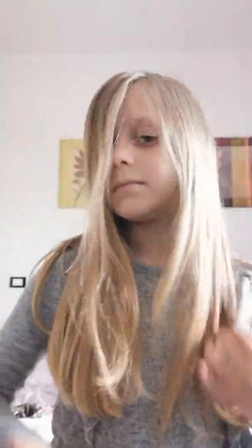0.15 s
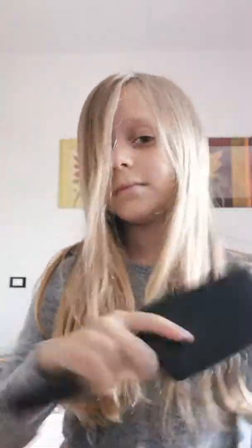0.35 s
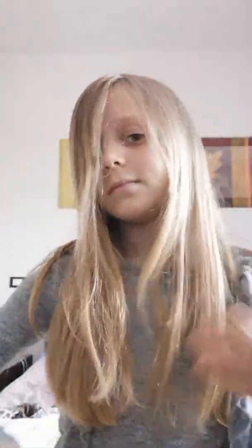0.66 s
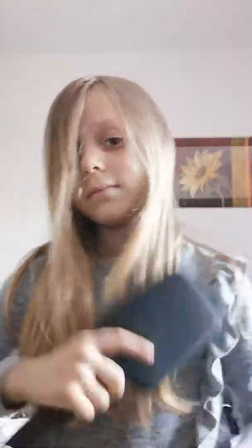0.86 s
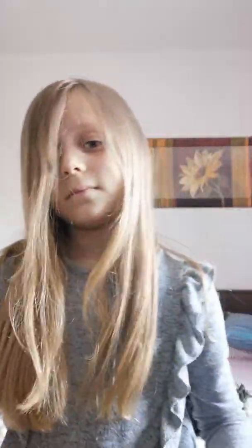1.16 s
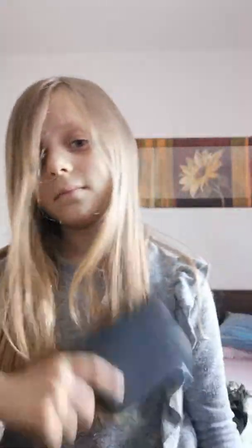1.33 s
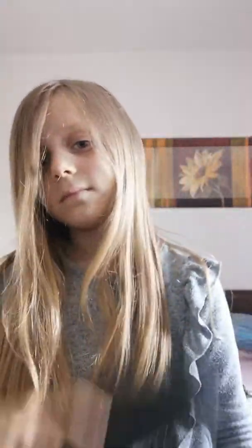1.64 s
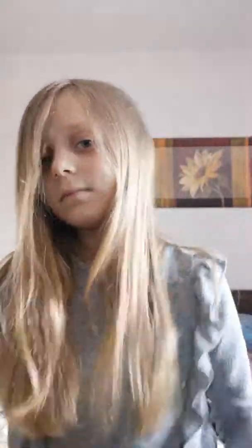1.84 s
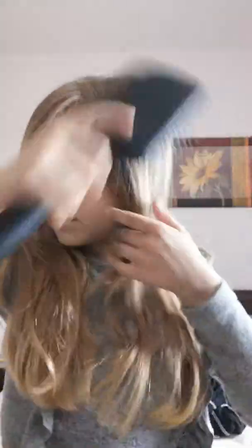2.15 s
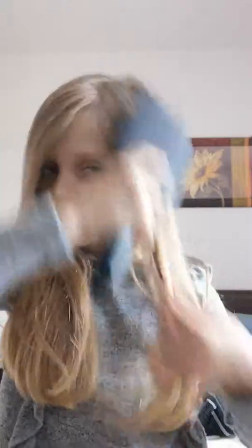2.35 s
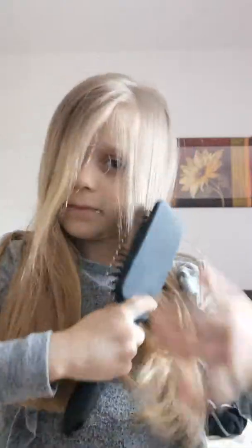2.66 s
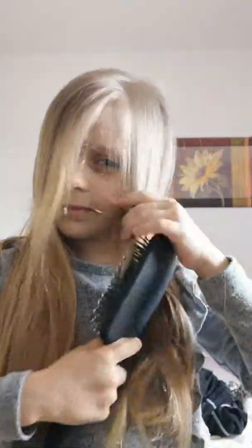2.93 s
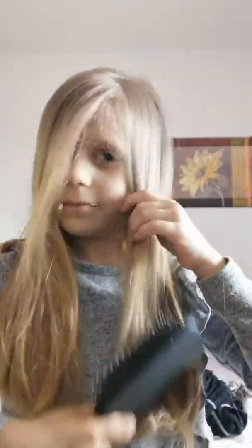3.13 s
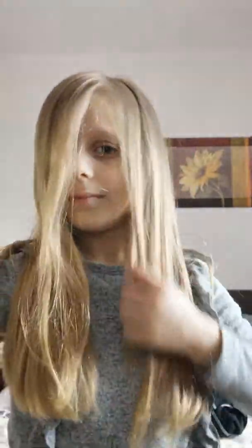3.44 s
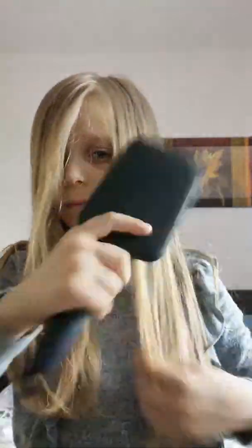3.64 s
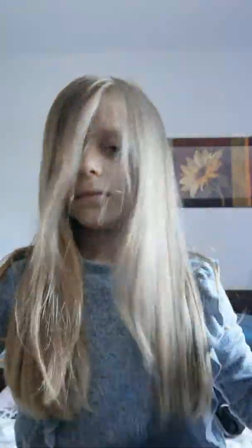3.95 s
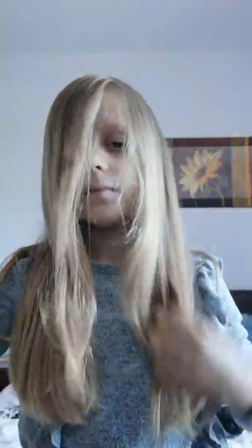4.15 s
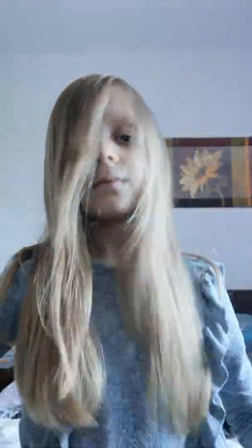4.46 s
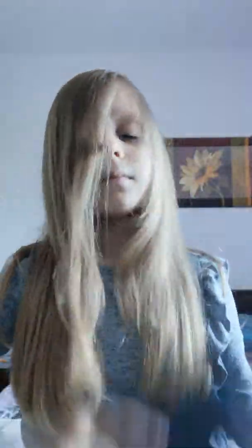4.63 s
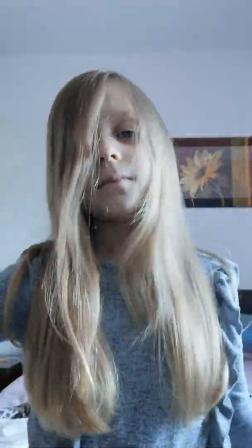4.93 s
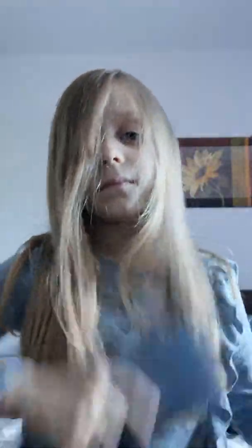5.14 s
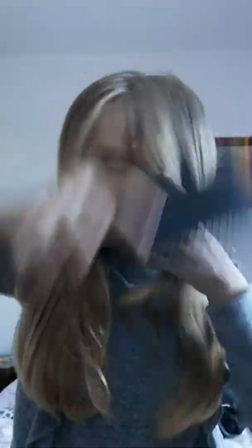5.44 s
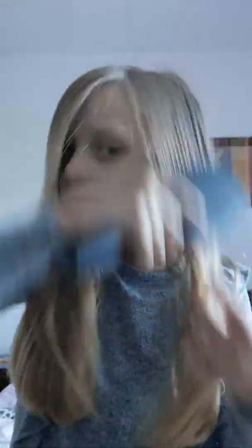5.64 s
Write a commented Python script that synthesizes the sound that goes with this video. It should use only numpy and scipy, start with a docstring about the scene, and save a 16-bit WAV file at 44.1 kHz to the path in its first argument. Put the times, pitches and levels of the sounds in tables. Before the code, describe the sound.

Spaced strokes of a hairbrush, each roughly a fifth of a second: a soft thump, a raspy swish of pins and a woody rubber drumming, with small snaps as knots give. A quieter lull of cloth and hair rustling comes midway, then knotty strokes and smoother, thumping ones. Close phone stereo, brush louder on the right, short soft room reflections and very quiet room tone.

```python
"""Brushing long hair

A paddle brush is drawn through long hair, stroke after stroke, close to a phone in a small bedroom.
It lands with a soft thump: damped booms. Pins catch and flick free: random bursts of noise force drum
the cushion's modes, scratch in the pins and hiss in the hair; tangles snap as short kicks and bursts.
Banded noise makes rustles, arm rumble and a sleeve's zip; a low hum and faint hiss fill the room."""
import sys
import numpy as np
from scipy import signal
from scipy.fft import rfft, irfft, next_fast_len
from scipy.io import wavfile
from scipy.ndimage import map_coordinates

SR = 44100
rng = np.random.default_rng(int(sys.argv[2]) if len(sys.argv) > 2 else 0)


def wrap_up_sound(samples):
    """Save the sound to the file named by the first command line argument, as 16-bit audio."""
    columns = np.atleast_2d(samples).T
    # keep every value between -1 and 1, then stretch to whole-number steps
    tamed = np.clip(columns, -1, 1)
    steps = np.round(tamed * 32767).astype(np.int16)
    wavfile.write(sys.argv[1], SR, steps)


N = 255339
SIZE = next_fast_len(N + SR)
HZ = np.fft.rfftfreq(SIZE, 1 / SR)
TIME = np.arange(N) / SR

# Pulls of the brush through the hair, levels before each layer's trim. Each row: start in seconds, rise in
# seconds, hold in seconds, cushion drumming in dB, pin scratch in dB, hair hiss in dB, tangle 0-1,
# body rumble in dB.
STROKES = [ (0.0, 0.019, 0.067, -47.5, -50, -65, 0.4, -64),
           (0.08, .025, 0.013, -40.5, -53, -69.5, 0.2, -58),
           (0.468, .072, .11, -38.5, -50.5, -64, 0.16, -54),
           (0.948, .088, .11, -39, -46.5, -64.5, 0.23, -59),
           (1.397, .101, .074, -36, -46, -61.5, 0.13, -62),
           (1.805, .074, 0.015, -42, -49.5, -64.5, .14, -52), (2.346, 0.087, 0.062, -63, -67, -67, .3, -66),
           (2.469, 0.047, 0.17, -69.5, -69.5, -70.5, 0.3, -68),
           (2.693, 0.048, 0.058, -66, -65, -70, .6, -70), (2.765, 0.071, 0.064, -50.5, -51, -60, .5, -70),
           (2.99, 0.11, 0.13, -46, -48, -57.5, .45, -61.5),
           (3.233, 0.034, .11, -42.5, -50.5, -64, .35, -57),
           (3.795, .063, .152, -43.5, -48.3, -60, 0.47, -52),
           (4.022, .035, 0.043, -40, -58, -76.5, .3, -46),
           (4.412, 0.058, 0.091, -36, -49.5, -64, 0.08, -63),
           (4.812, .07, 0.071, -38.5, -47.4, -62.5, 0.02, -52),
           (5.181, .062, .048, -35.5, -48.5, -63, 0.04, -54),
           (5.589, 0.097, .13, -59.5, -63, -67, .05, -66)]
# The brush lands on the hair, levels before each layer's trim. Each row: time in seconds, tick in dB,
# thump in dB, knock in dB, swish in dB.
LANDINGS = [(0.4648, -44, -43, -38, -57), (0.9386, -50.5, -39.5, -42, -60.5),
            (1.3868, -44.5, -41.5, -44.5, -59.5), (1.7968, -46, -42.5, -43, -60.5),
            (2.3088, -50, -49, -51.5, -62), (3.7942, -34, -70, -52, -59), (4.422, -46, -63, -52, -62),
            (4.8116, -50, -36.5, -38, -60.5), (5.186, -56, -52, -45, -68), (5.2094, -54, -44, -35.5, -71),
            (5.604, -36, -62, -42, -52)]
# Level of the brush at the left port over the right. Each row: frequency in Hz, ratio in dB.
BALANCE_DB = [(370, -0.5), (700, -9), (980, -11), (1600, -2.5), (2050, -8.5), (2600, -7.5), (4000, -6.5),
              (9000, -7), (10500, -15)]
# Likeness of the brush at the two ports. Each row: frequency in Hz, likeness 0-1.
LIKENESS = [(350, 1), (600, 0.99), (1000, 0.38), (1500, 0.75), (2400, 0.4), (3500, 0.15)]
# Phase lead of the brush at the left port. Each row: frequency in Hz, lead in radians.
LEAD = [(110, 0), (330, -.75), (430, -1.2), (600, -2.4), (850, -2.9), (1300, -6.7), (2600, -9.1)]
# Likeness of the room at the two ports. Each row: frequency in Hz, likeness 0-1.
AIR_LIKENESS = [(130, 0.97), (280, 0.77), (450, 0.073)]


def brush(drum, scratch, hiss, tangle):
    """The same flicks drum the cushion, scratch in the pins and crackle in the hair; knots jerk more coarsely."""
    # Tangles letting go of a pin, and at 4.06 s a pat of the hand. Each row: time in seconds, level before the
    # shares below in dB, brightness in dB (more crackle in the hair, less drumming).
    snaps = [(0.014, -29.5, 1), (0.0296, -27, 0), (0.0765, -38, 9), (0.111, -32, -9), (0.3462, -60.5, 26.5),
             (0.5395, -26, 3), (0.582, -32, -17), (1.030, -27, -6), (1.052, -25.5, -5), (1.0695, -24, 1),
             (1.095, -26.5, -14.5), (1.176, -36.5, 4), (1.4847, -30, 4), (1.505, -27, -14),
             (1.8844, -28.5, -7), (1.902, -31.5, -6), (2.529, -45, -15.5), (2.666, -54, -16),
             (2.7145, -42, 6), (2.761, -39.5, 1), (2.793, -44, -2), (2.8247, -25.5, 4.5),
             (2.834, -27.5, -2), (2.8913, -26, 2), (3.0123, -34, 2), (3.0828, -31, 4), (3.2194, -23, 2),
             (3.267, -24, 6), (3.2882, -20, -5), (3.342, -31, -8), (3.8756, -23.5, 5), (3.9038, -24, -2),
             (3.922, -24.5, 0), (3.9637, -24, -2), (3.9947, -21, -3), (4.0602, -36, -15),
             (4.4554, -34.5, 12.5), (4.461, -27, 4), (4.505, -28, -11), (4.543, -25, -9), (4.896, -26.5, 1),
             (4.926, -21, -10), (5.249, -26, -8)]
    # Colour of the pins at mid speed. Each row: frequency in Hz, relative density in dB per Hz.
    pin_spectrum = [(300, -29), (480, -4.5), (800, 1.5), (1000, -5), (1200, -3.5), (2100, -7), (3000, -19),
                    (4500, -36), (7000, -63.5)]
    # Colour of the hair. Each row: frequency in Hz, relative density in dB per Hz.
    hair_spectrum = [(1880, -15.5), (3200, -2), (4170, -6), (5500, -4.5), (8290, -8), (10800, -4.5),
                     (14300, -18), (15500, -20)]
    snap_drum_db, snap_scratch_db, snap_hiss_db = 4.5, -2, -19.5  # a snap's share in each layer
    pin_shift, cushion_shift = 0.068, 0.045  # log pitch swing with speed and with pressure

    power = (1 - tangle) * flicks(rate_hz=900, spread_db=3.4, life_s=0.00029)
    power += tangle * flicks(rate_hz=85, spread_db=3.5, life_s=0.0013)
    clumps = unit(amp(1.3 * wobble(60)))  # locks of hair load the pins in turn
    snapped, snap_db, bright_db = np.transpose(snaps)
    landed, tick_db, _, knock_db, swish_db = np.transpose(LANDINGS)

    on_cushion = amp(0.4) * drum * clumps * friction(power, share=0.72)
    on_cushion[0] += kicks(snapped, snap_db + snap_drum_db - bright_db)
    on_cushion[0] += kicks(landed, knock_db + 12.0)

    on_pins = amp(3.0) * scratch * clumps * friction(power, share=0.81)
    on_pins += bursts(snapped, snap_db + snap_scratch_db, life_s=0.00078, rise_s=0.0001)
    on_pins += bursts(landed, tick_db + 1, life_s=0.0033, rise_s=0.0018)

    on_hair = amp(0.9) * hiss * friction(power, share=0.29 + 0.5 * tangle)
    on_hair += bursts(snapped, snap_db + snap_hiss_db + bright_db, life_s=0.0011, rise_s=0.00028)
    on_hair += bursts(landed, swish_db + 4.5, life_s=0.0036, rise_s=0.0024)

    def cushion_at(ratio):
        """The cushion with its modes at this pitch ratio."""
        return cushion_response(ratio, low_hz=215, high_hz=1750)

    def pins_at(ratio):
        """The pins with their colour at this pitch ratio."""
        return causal(amp(along(pin_spectrum, HZ / ratio)))

    pressure = wobble(12)  # the hand presses unevenly, tightening and slackening the cushion
    sound = gliding(on_cushion, cushion_at, cushion_shift, pressure)
    sound += gliding(on_pins, pins_at, pin_shift, speed())
    sound += filtered(on_hair, causal(amp(along(hair_spectrum))))
    return ports(sound, BALANCE_DB, LIKENESS, along(LEAD))


def cushion_response(ratio, low_hz, high_hz):
    """The cushion's broad modes, stretched by ratio; the small paddle radiates little below them."""
    # Rubber cushion in its hollow paddle. Each row: frequency at ratio 1 in Hz, half-power width in Hz,
    # relative level in dB.
    cushion_modes = [(274, 45, 7), (339, 73, 0), (414, 105, -4), (532, 60, -5), (737, 47, -6),
                     (898, 54, -4), (1143, 39, -9)]
    power = 0
    for hz, width_hz, db in cushion_modes:
        power = power + amp(2 * db) / (1 + ((HZ - hz * ratio) / (width_hz / 2)) ** 2)
    power = power / (1 + (low_hz / (HZ + 1)) ** 8) / (1 + (HZ / high_hz) ** 8)
    return causal(np.sqrt(power))


def pulls():
    """Gains of cushion, pins and hair, and how knotted the lock under the brush is."""
    # Shape of every pull: hiss and scratch give way to drumming as the brush travels toward the tips.
    # Each holds: lag in seconds, swell over the rise in dB, drift over the hold in dB,
    # crest in mid-hold in dB, release in dB per second.
    drum_shape = (-0.0044, 21, -1.5, 3, 352)
    scratch_shape = (0, 24, -3.5, 1, 229)
    hiss_shape = (.006, 17, -3.5, 1.5, 245)
    start, _, _, drum_db, scratch_db, hiss_db, tangle, _ = np.transpose(STROKES)
    current = np.searchsorted(start[1:], TIME)
    drum = stroke_gain(drum_db, drum_shape)
    scratch = stroke_gain(scratch_db, scratch_shape)
    hiss = stroke_gain(hiss_db, hiss_shape)
    return drum, scratch, hiss, np.clip(tangle[current], 0, 1)


def stroke_gain(levels_db, shape):
    """One layer's gain: each pull swells, crests in mid-hold and dies as the brush slips out."""
    touch_s = 0.013  # the pins sink into the hair this long before a pull
    lag_s, swell_db, drift_db, crest_db, release_db_per_s = shape
    gain = np.zeros(N)
    for (start, rise, hold, *_), level_db in zip(STROKES, levels_db):
        t = TIME - start - lag_s
        db = level_db + swell_db * np.minimum(t / rise - 1, 0)
        travel = np.clip((t - rise) / hold, 0, 1)
        db += drift_db * (travel - 0.5) + crest_db * (np.sin(np.pi * travel) - 0.5)
        db -= release_db_per_s * np.maximum(t - rise - hold, 0)
        touch = np.clip(t / touch_s + 1, 0, 1)
        gain = np.maximum(gain, touch * amp(db))
    return gain


def speed():
    """The pins' speed, -1 slow to 1 fast: highest as they land and as each pull gets going."""
    peak_s, impact_s = 0.049, 0.01  # Gaussian half lengths (to 1/e)
    pulling = [np.exp(-((TIME - start - rise) / peak_s) ** 2) for start, rise, *_ in STROKES]
    landing = [np.exp(-((TIME - s) / impact_s) ** 2) for s, *_ in LANDINGS]
    return 2 * np.max(pulling + landing, axis=0) - 1


def flicks(rate_hz, spread_db, life_s):
    """Power (mean 1) of pins flicking free at random moments, a few much harder than the rest."""
    released = rng.random(N) < rate_hz / SR
    size = amp(spread_db * np.minimum(rng.standard_normal(N), 2))
    power = signal.lfilter([1], [1, -np.exp(-1 / (life_s * SR))], released * size ** 2)
    return power / power.mean()


def friction(power, share):
    """Noise force of flicks (their share of the power) over smooth sliding."""
    share = np.clip(share, 0, 1)
    return rng.standard_normal((2, N)) * np.sqrt(share * power + 1 - share)


def bursts(times_s, levels_db, life_s, rise_s):
    """A short burst of noise force at each time, swelling and dying."""
    t = np.arange(SR // 20) / SR
    envelope = np.exp(-t / life_s) * (1 - np.exp(-t / rise_s))
    force = np.zeros((2, N + len(t)))
    for s, db in zip(times_s, levels_db):
        burst = rng.standard_normal((2, len(t))) * envelope
        force[:, round(s * SR):][:, :len(t)] += amp(db) * burst
    return force[:, :N]


def kicks(times_s, levels_db):
    """One clean push, a single sample, at each time."""
    samples = np.round(np.asarray(times_s) * SR).astype(int)
    return np.bincount(samples, amp(levels_db), N)[:N]


def gliding(force, response, shift, position):
    """force through response(pitch ratio), crossfading log pitch from -shift to shift as position goes -1 to 1."""
    position = np.clip(position, -1, 1)
    sound = 0
    for step in (-1, 0, 1):
        weight = np.maximum(1 - abs(position - step), 0)
        sound = sound + filtered(force * weight, response(np.exp(shift * step)))
    return sound


def chest_echo(x, strength, delay_s, travel):
    """The chest throws the sound back; the delay wanders at random, so the colour shifts."""
    lag = delay_s * np.exp(travel * wobble(6)) * SR
    echo = np.array([np.interp(np.arange(N) - lag, np.arange(N), side) for side in x])
    return (x + strength * echo) / np.hypot(1, strength)


def thumps(body_hz, paddle_hz, drag_hz, drag_width_hz):
    """Body and paddle boom at each landing, pitched a little differently; the body rumbles as the brush drags."""
    # Rumble over a pull: lag in seconds, swell over the rise in dB, drift over the hold in dB,
    # crest in mid-hold in dB, release in dB per second.
    rumble_shape = (0, 12, -2.5, 1, 152)
    rumble_db = np.transpose(STROKES)[-1]
    drag = stroke_gain(rumble_db, rumble_shape) * drone(drag_hz, drag_width_hz)
    sound = np.pad(drag, (0, SR))
    shifts = np.exp(rng.normal(0, 0.08, (len(LANDINGS), 2)))
    for (s, _, thump_db, knock_db, _), shift in zip(LANDINGS, shifts):
        body = amp(thump_db + 14) * boom(body_hz * shift[0], t60_s=0.09, attack_s=0.012)
        paddle = amp(knock_db + 7) * boom(paddle_hz * shift[1], t60_s=0.062, attack_s=0.0076)
        sound[round(s * SR):][:len(body)] += body + paddle
    return sound[:N]


def boom(hz, t60_s, attack_s):
    """A sine with a soft attack and quick exponential damping."""
    t = np.arange(SR // 4) / SR
    return np.sin(2 * np.pi * hz * t) * amp(-60 * t / t60_s) * (1 - np.exp(-t / attack_s))


def sleeve(width_hz):
    """Ribs of cloth slide past the hair in a thin zip: a gliding tone blurred by slow noise."""
    # Path of the zip. Each row: time in seconds, pitch in Hz, drive in dB.
    zip_path = [(1.972, 7150, -74), (2.0, 8950, -57), (2.035, 8500, -68), (2.08, 6400, -81)]
    s, pitch_hz, db = np.transpose(zip_path)
    blur = unit(filtered(rng.standard_normal((2, N)), 1 / (1 + (HZ / width_hz) ** 2)))
    tone = np.sin(2 * np.pi * np.cumsum(np.interp(TIME, s, pitch_hz)) / SR)
    side_db = [[0], [4]]  # left, right
    return amp(np.interp(TIME, s, db, -120, -120) + side_db) * blur * tone


def rustle():
    """Soft swishes and rumbles as hand, sleeve and brush move about the hair: swelling bands of noise."""
    # Light rubs of hair and cloth, low rumbles of the moving arm. Each row: centre in seconds, level in dB,
    # centre in Hz, half-amplitude width in Hz, half length (to 1/e) in seconds.
    rubs = [(2.022, -68, 8200, 5500, 0.036), (2.25, -57.5, 92, 30, 0.063), (2.325, -66, 2200, 600, .018),
            (2.345, -59, 120, 60, 0.028), (2.42, -60.5, 1700, 1030, 0.033),
            (2.473, -64, 11900, 4500, 0.027), (2.517, -71, 670, 500, 0.084),
            (2.584, -67.5, 3400, 1800, 0.086), (3.915, -48, 205, 50, 0.029),
            (5.156, -74, 8800, 4000, 0.045), (5.65, -65, 2100, 900, 0.041),
            (5.767, -66.5, 12600, 3500, 0.063)]
    t = np.arange(SR) / SR - 0.5
    hz = np.fft.rfftfreq(SR, 1 / SR)
    sound = np.zeros((2, N + SR))
    for s, db, centre_hz, width_hz, length_s in rubs:
        band = 1 / (1 + ((hz - centre_hz) / width_hz * 2) ** 2)
        swish = unit(irfft(rfft(rng.standard_normal((2, SR))) * band, SR))
        sound[:, round(s * SR):][:, :SR] += amp(db) * np.exp(-(t / length_s) ** 2) * swish
    return ports(sound[:, SR // 2:][:, :N], BALANCE_DB, LIKENESS, along(LEAD))


def bedroom(x):
    """The short, soft answer of a furnished room: decaying noise whose long waves reach both ports alike."""
    # Decay of the room. Each row: frequency in Hz, t60 in seconds.
    decay_t60 = [(500, 0.33), (10000, 0.32)]
    hz, t, z = signal.stft(rng.standard_normal((2, SR // 2)), SR, nperseg=256)
    alike = np.clip(along(AIR_LIKENESS, hz), 0, 1)[:, None]
    z[0] = alike * z[1] + np.sqrt(1 - alike ** 2) * z[0]
    decay = amp(-60 * t / along(decay_t60, hz)[:, None])
    tail = signal.istft(z * decay, SR, nperseg=256)[1]
    return signal.fftconvolve(x, tail / np.linalg.norm(tail[0]), axes=1)[:, :N]


def room_tone(hum_hz, hum_width_hz, hum_db, air_db):
    """Low rumble and faint hiss from shaped noise, and a blurred, wavering hum from a narrow band."""
    # Colour of the air. Each row: frequency in Hz, relative density in dB per Hz.
    air_spectrum = [(12, -48), (24, -8), (106, -6.5), (205, -14), (255, -27), (372, -27.5), (581, -33),
                    (790, -33.5), (858, -29), (987, -32), (2540, -28.5), (3010, -34.5), (15500, -46)]
    # Level of the air at the left port over the right. Each row: frequency in Hz, ratio in dB.
    air_balance_db = [(400, 0), (8500, -2), (11000, -6)]
    air = filtered(rng.standard_normal((2, N)), unit(amp(along(air_spectrum))))
    level_db = air_db + 1.4 * wobble(5.26) + 0.73 * wobble(22)
    air = amp(level_db) * ports(air, air_balance_db, AIR_LIKENESS, 0)
    return air + amp(hum_db) * drone(hum_hz, hum_width_hz)


def drone(hz, width_hz):
    """A narrow band of noise at rms 1, half amplitude at width_hz either side."""
    return unit(filtered(rng.standard_normal(N), 1 / (1 + ((HZ - hz) / width_hz) ** 2)))


def ports(pair, balance_db, likeness, lead_rad):
    """Two unrelated signals become left and right, keeping the level of their middle."""
    ratio = amp(along(balance_db)) * np.exp(1j * lead_rad)
    alike = np.clip(along(likeness), 0, 1)
    shared, own = ratio * alike, ratio * np.sqrt(1 - alike ** 2)
    middle = np.hypot(abs(1 + shared), abs(own)) / 2
    left = filtered(pair[0], shared / middle) + filtered(pair[1], own / middle)
    right = filtered(pair[0], 1 / middle)
    return np.array([left, right])


def causal(gain):
    """The minimum-phase response with this gain, at unit power."""
    cepstrum = irfft(np.log(np.maximum(gain, 1e-6)), SIZE)
    return unit(np.exp(rfft(2 * cepstrum[:SIZE // 2], SIZE)))


def filtered(x, response):
    """x through a frequency response."""
    return irfft(rfft(x, SIZE) * response, SIZE)[..., :N]


def wobble(rate_hz):
    """A smooth random curve, rate_hz knots a second."""
    return map_coordinates(rng.standard_normal(int(N * rate_hz / SR) + 4), [TIME * rate_hz])


def along(points, hz=HZ):
    """(Hz, value) points joined on a log frequency axis."""
    f, v = np.transpose(points)
    return np.interp(np.log(hz + 1), np.log(f + 1), v)


def unit(x):
    """Scale to rms 1."""
    return x / np.sqrt(np.mean(np.abs(x) ** 2) + 1e-20)


def amp(db):
    """Decibels to gain."""
    return 10 ** (np.asarray(db) / 20)


def scene():
    """Brushing close by, the room behind it."""
    drum, scratch, hiss, tangle = pulls()
    near = chest_echo(brush(drum, scratch, hiss, tangle), strength=0.35, delay_s=0.001702, travel=0.303)
    near += thumps(body_hz=91, paddle_hz=197.3, drag_hz=92.4, drag_width_hz=30)
    near += sleeve(width_hz=210) + rustle()
    room = room_tone(hum_hz=96, hum_width_hz=14, hum_db=-67.5, air_db=-65.7)
    return near + amp(-12.0) * bedroom(near) + room


def record(dry):
    """The phone keeps nothing above its band limit."""
    top_hz = 15600
    return filtered(dry, HZ < top_hz)


dry = scene()
out = record(dry)
wrap_up_sound(out)
```